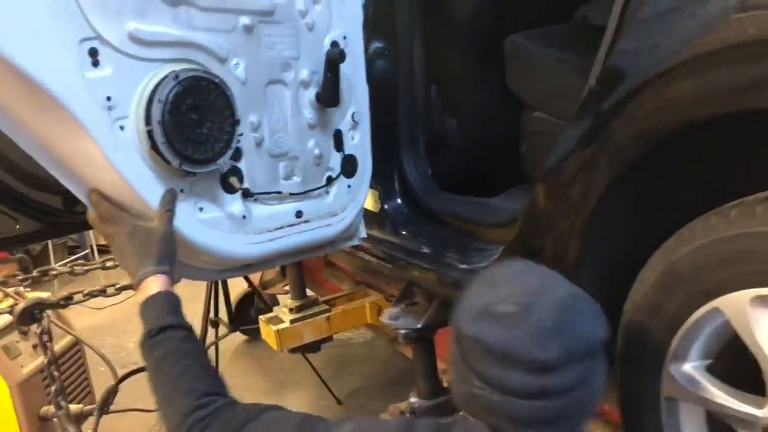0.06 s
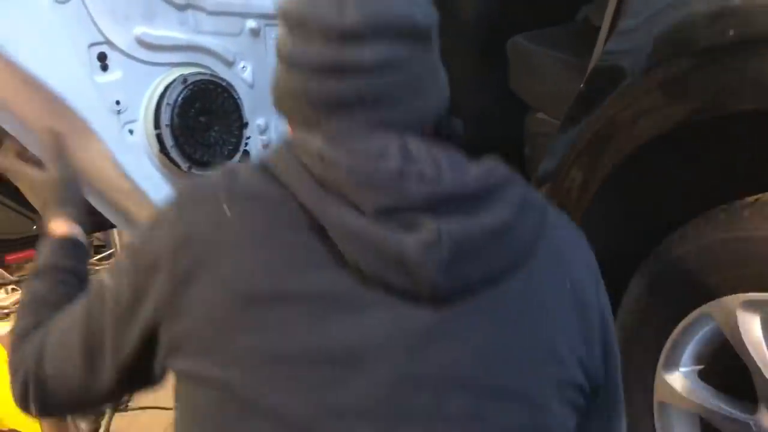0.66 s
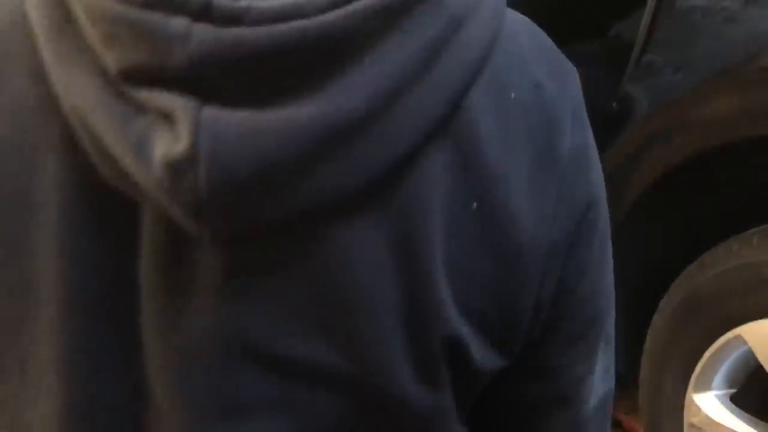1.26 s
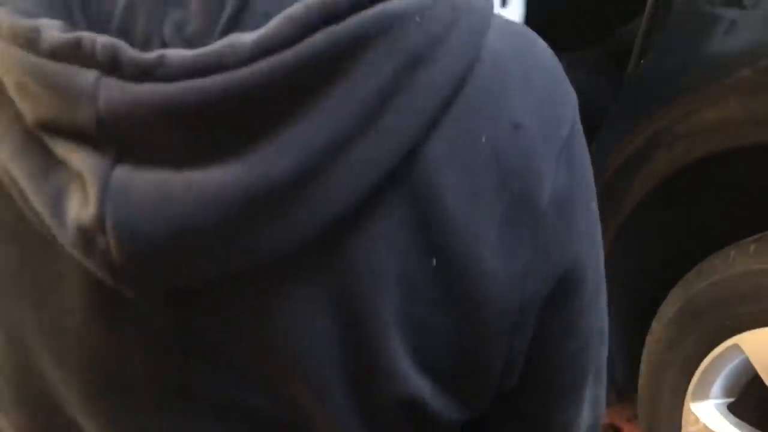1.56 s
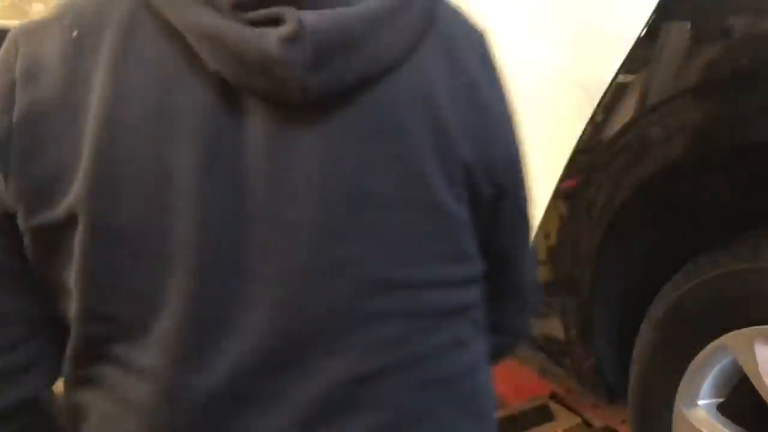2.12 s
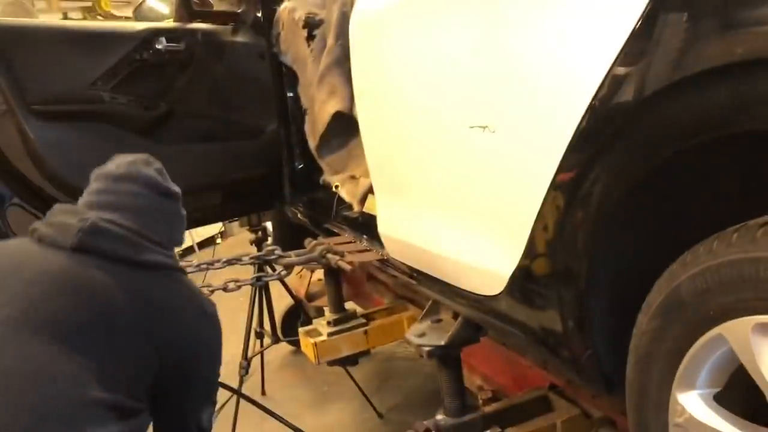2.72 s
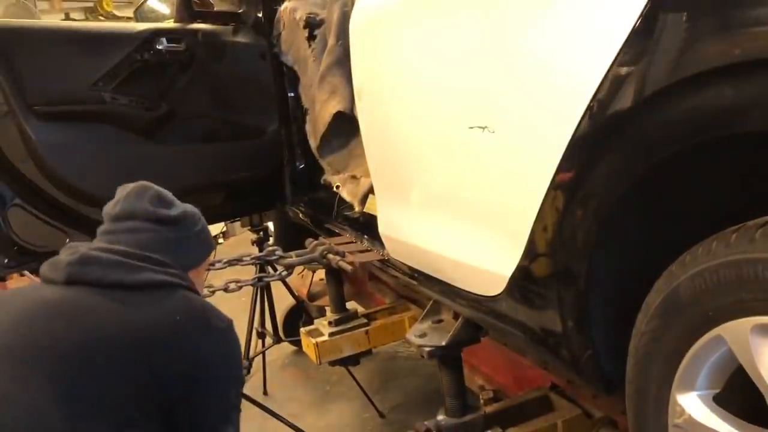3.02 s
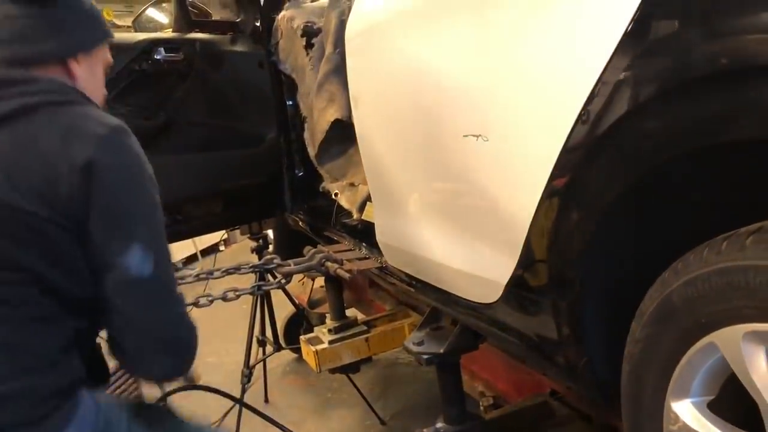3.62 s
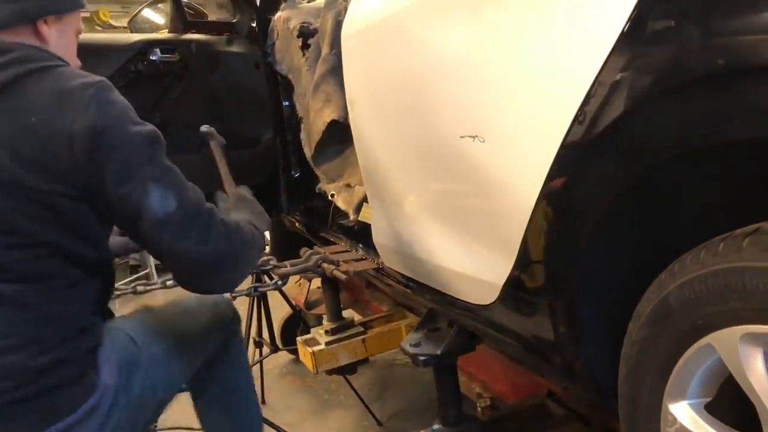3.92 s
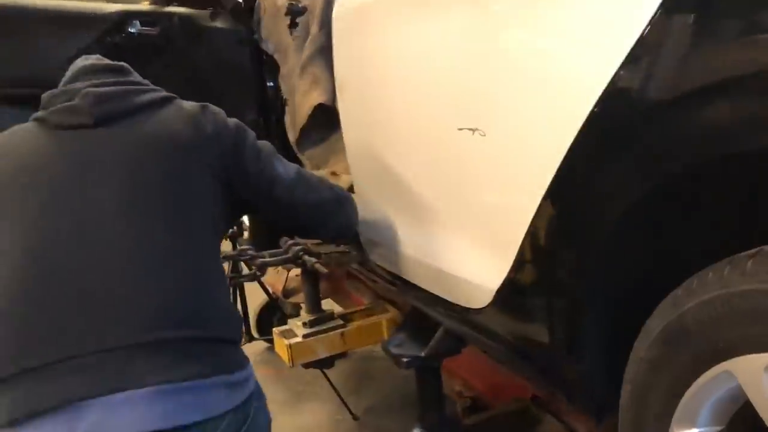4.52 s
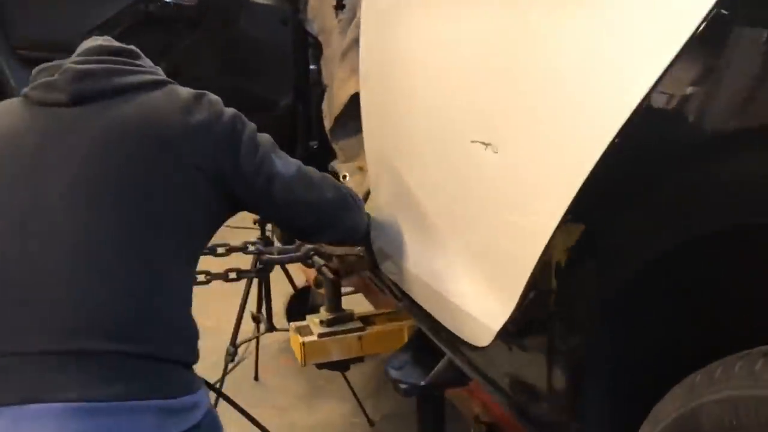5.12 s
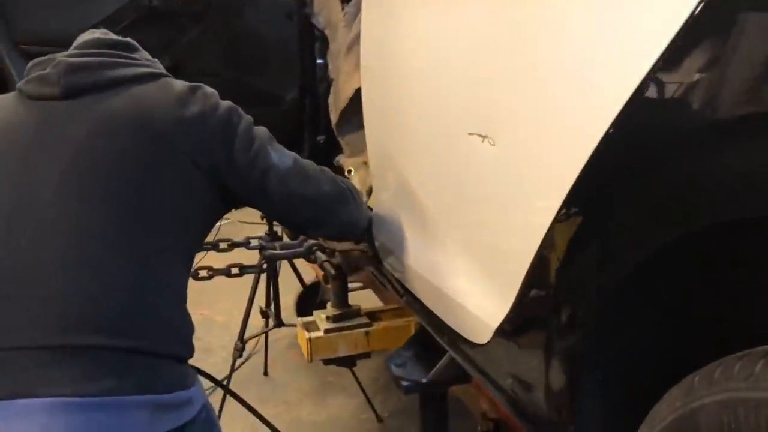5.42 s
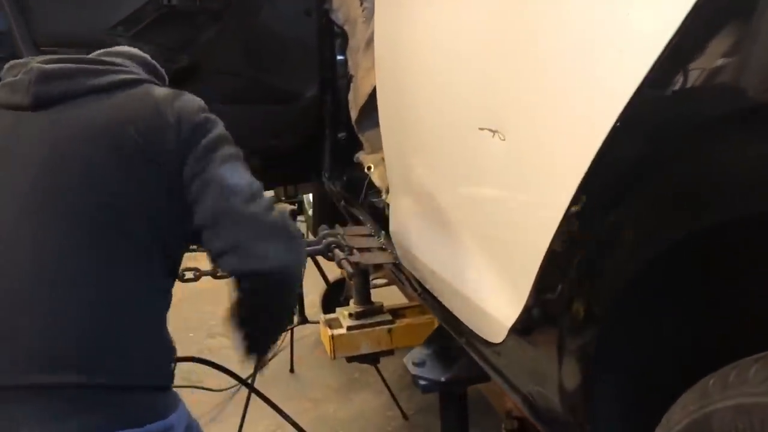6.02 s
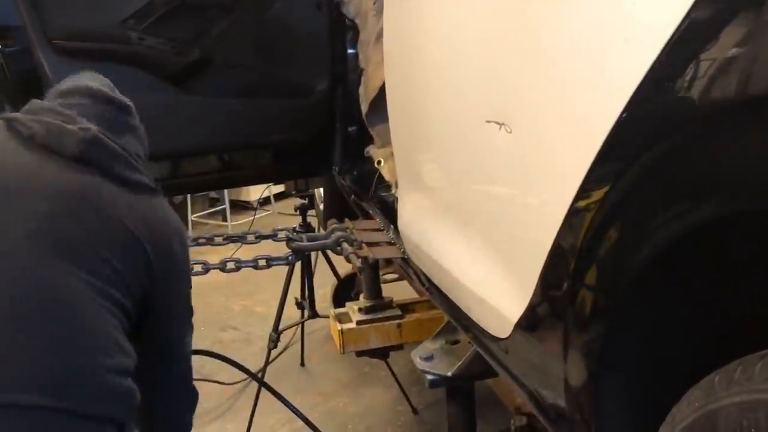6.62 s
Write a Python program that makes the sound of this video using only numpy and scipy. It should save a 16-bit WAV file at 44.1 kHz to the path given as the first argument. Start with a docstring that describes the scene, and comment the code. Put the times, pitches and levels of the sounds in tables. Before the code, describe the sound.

A faint machine rumble, hum and moving air fill a hard-walled workshop throughout. Clothes rustle very softly, with a dull footstep at 0.8 seconds and a shoe scuff at 1.5. At about 1.85 seconds a car door shuts with a quick latch rattle and a low thud. A steel bar clanks onto concrete at 2.8 seconds and another small tool clinks at 3.0. Faint ticks of tool and chain follow, with a footstep at 4.2. Then come the loudest sounds: four nearby hammer blows on a car's sheet steel panel, at 4.6, 4.95, 5.3 and 5.65 seconds, each a sharp crack with a hollow boom and a short metallic ring echoing in the room. At about 6.5 seconds the hammer drops on the floor, one end and then the other, with a bright, briefly ringing clatter.

```python
"""Soft shuffling and rustling clothes come first, over the low machine hum of a body shop. A man shuts a
car door, shifts steel tools on the concrete and hammers a chained, tensioned side panel four times, then
drops the hammer, which lands on one end and then the other. Each impact is a brief broadband burst; door,
tools and panel go on vibrating in their damped normal modes, and the hard room reverberates."""
import sys
import numpy as np
from scipy import signal
from scipy.fft import rfft, irfft, next_fast_len
from scipy.io import wavfile
from scipy.ndimage import uniform_filter1d

SR = 44100
rng = np.random.default_rng(int(sys.argv[2]) if len(sys.argv) > 2 else 0)


def bounce(signal):
    """Save signal as a 16-bit WAV file at the path given by the first command-line argument."""
    frames = np.transpose(np.atleast_2d(signal))
    limited = np.clip(frames, -1, 1)
    pcm = np.round(limited * 32767).astype(np.int16)
    wavfile.write(sys.argv[1], SR, pcm)


N = 298557
T = np.arange(SR) / SR  # seconds since a contact
SCENE_T = np.arange(N) / SR

# hammer blows on the panel: start_s, level_db, hollowness_db, swell_db
BLOWS = [(4.6042, -2, 1, -15.5), (4.959, -0.5, -3.5, -8), (5.3054, -1, -2, -7), (5.637, -1, 5, -8.5)]
# the boom swells again after each blow: delay_s, pitch_hz, level_db
SWELLS = [(.07, 340, 0), (.135, 305, -3)]
# spectra of the contact, the sheet giving way and its dense ringing: frequency_hz, level_db
CRACK_SPECTRUM = [(120, -42), (200, 3.5), (473, -6), (709, -0.5), (1350, -1), (1940, -1.5), (2560, -12.5),
                  (3560, -2), (4520, -14), (5040, -12.5), (8580, -15), (13100, -28.5), (16000, -39.5)]
THUMP_SPECTRUM = [(41, -40), (70, -32), (100, -19), (130, -11.5), (206, 3.5), (262, -6), (385, -1),
                  (432, 2.5), (517, 1.5), (643, 6), (1020, -3), (1300, -13.5), (1500, -49), (1950, -48.5),
                  (3300, -120)]
SHEET_SPECTRUM = [(24, -60.5), (40, -35.5), (127, -4), (189, -4), (215, -1), (256, -2), (305, -2.5),
                  (503, -14.5), (630, -13), (810, -22), (1020, -21), (2500, -28.5), (6170, -33),
                  (9690, -38), (16000, -53.5)]
# strongest modes of the panel: pitch_hz, level_db, t60_s
PANEL_MODES = [(137.4, -9, 0.74), (161.7, -7.5, 0.87), (182.2, -5, 0.82), (223.4, -1.5, 0.74),
               (243.4, 5, 0.32), (298, 0, 0.71), (308.5, -10.5, 0.94), (392.5, -3.5, 0.75),
               (404.5, -4.5, 0.65), (472, -8.5, 0.78), (547, -12, 0.76), (612, -3.5, 0.46),
               (690, 0.5, 0.21), (748, -13, 0.81), (930, -10.5, 0.64), (1020, -10.5, 0.75),
               (1477, -10.5, 0.42), (1860, -24.5, 0.64)]

# floor contacts of a bar laid down, a clamp tipping over and the hammer dropped handle first:
# start_s, level_db, bass_db, middle_db, treble_db, snap_db
BAR_HITS = [(2.793, -25.5, -9, 2.5, -4.5, 3.5), (2.805, -26, -2.5, 0.5, -2.5, -15),
            (2.869, -42.5, 14.5, -12, 1, 11)]
CLAMP_HITS = [(3.0205, -24, 0, -0.5, -12.5, 2.5), (3.089, -30.5, 1, 2, 5, 4.5)]
HAMMER_HITS = [(6.4825, -20, 1, 10, 8, -15.5), (6.486, -16.5, 4, 5, 0, 2),
               (6.5575, -9.5, -12.5, -12.5, -6, 5.5), (6.574, -18, 0.5, 10, 1, -2.5)]
# spectrum of each tool's knock: frequency_hz, level_db
BAR_SPECTRUM = [(59, -39), (100, -28), (229, -7.5), (308, -6), (381, 2), (662, -17), (801, -9.5),
                (1080, -11), (2080, -9), (3400, -16), (3780, -15), (6150, -22.5), (16000, -52)]
CLAMP_SPECTRUM = [(59, -45), (100, -13), (160, -23), (197, -8), (229, -7.5), (481, -7), (535, -9),
                  (736, -6.5), (1010, -9.5), (1450, -2), (2170, -9.5), (2800, -3.5), (3120, -18),
                  (4770, -22.5), (16000, -59)]
HAMMER_SPECTRUM = [(59, -55), (100, -27), (166, -22), (283, 4.5), (433, -14.5), (481, -12), (634, -10),
                   (854, -9), (1520, -4), (1610, -1.5), (1950, -10.5), (2520, -7), (2930, -13), (7940, -20),
                   (16000, -45.5)]
# modes of each tool: pitch_hz, level_db, t60_s
BAR_MODES = [(397, 5, 0.24), (925, 0, 0.16), (1720, -7, 0.75), (2100, -8, 0.42), (2870, -10, 0.31),
             (3030, 3, 0.21), (3200, -9, 0.33), (3740, -15, .5), (4185, -18, .7)]
CLAMP_MODES = [(199, 2, 0.49), (742, -10, 1), (1165, -8, 0.89), (1400, -1, 0.82), (1490, -0.5, 0.76),
               (2330, -7, 0.77), (2567, -13, .7), (2710, 0, 0.4), (2790, -4, 0.83), (2570, 4.5, 0.22)]
HAMMER_MODES = [(318, -11, 0.32), (489, -2, 1), (842, -6, 0.7), (1170, -7, 0.64), (1340, -4, 0.37),
                (1590, 4.5, 0.33), (1580, 0, 0.41), (1730, -8.5, 0.3), (1780, -12, 0.74), (2010, -4, 0.52),
                (2470, -1, 0.78), (2550, 1.5, .8), (2450, -11, 0.56), (3130, 0.5, 0.38), (4670, 0, 0.29)]

# latch, catch and slam of the door: start_s, level_db, bass_db, middle_db, treble_db
DOOR_HITS = [(1.831, -23.5, -14, -13, -9.5), (1.846, -21.5, -5.5, -2, 4), (1.859, -24, 1.5, 1, -11),
             (1.875, -22, 4.5, 0.5, 3.5)]
# spectra of the door's impact and the cabin's boom: frequency_hz, level_db
SLAM_SPECTRUM = [(18, -43), (30, -17), (109, -2.5), (204, -14), (328, -8), (437, -14), (584, -5),
                 (866, -8.5), (1040, -4.5), (1320, -14.5), (3060, -23.5), (6550, -31), (10500, -39),
                 (16000, -57)]
CABIN_SPECTRUM = [(18, -42), (30, -11), (145, 0), (194, -12), (233, -10.5), (345, -12), (702, -14.5),
                  (801, -23), (962, -14.5), (1070, -20.5), (1540, -19.5), (6050, -37), (10500, -45),
                  (16000, -73)]
# modes of the door skin: pitch_hz, level_db, t60_s
SKIN_MODES = [(48, -14, 1), (94.7, -9, 0.57), (122, 7, 0.28), (151.3, -1, 0.54), (174.8, -9, 0.49)]

# footfalls: start_s, level_db, hardness_db, settle_s
STEPS = [(0.798, -33, -23, 0.2), (0.858, -37.5, -10, 0.053), (4.187, -28.5, 2.5, 0.067)]
# light ticks of tool and chain: start_s, level_db, dullness_db
TICKS = [(2.189, -44.5, 13.5), (2.518, -44, 3), (2.993, -44.5, 4), (3.867, -53, -6), (3.973, -50.5, 9),
         (4.057, -43, -5.5), (4.307, -48.5, 2.5), (4.488, -52.5, -6.5), (4.513, -41, 5.5)]
# shoes sliding: peak_s, level_db, half_length_s
SCUFFS = [(1.402, -54.5, 0.026), (1.514, -41, 0.028), (4.561, -49.5, 0.036)]
# movements that rustle the clothes: start_s, length_s, level_db
MOVES = [(0.147, 0.21, -70), (0.62, 0.17, -70.5), (2.196, .35, -65.5), (2.891, 1.7, -65.5),
         (6.049, 0.18, -65)]
# spectra of a footfall, a tick, a sliding shoe and rubbing cloth: frequency_hz, level_db
SOLE_SPECTRUM = [(47, -45.5), (80, -27), (198, -2), (405, -23), (491, -16), (1020, -38.5), (1720, -41.5),
                 (2770, -47), (4170, -40.5), (6030, -41.5), (14000, -58)]
TICK_SPECTRUM = [(240, -33), (400, 1.5), (1790, -1), (3020, -7.5), (4510, -4), (7280, -8.5), (7990, -8.5),
                 (13500, -21.5), (16000, -34)]
SCUFF_SPECTRUM = [(180, -44), (300, -17), (364, -6), (1070, -12.5), (1700, 0.5), (2240, -8), (2670, -4.5),
                  (2940, -12), (5080, -16), (14000, -47)]
CLOTH_SPECTRUM = [(880, -32), (1500, 8.5), (1710, -8), (2910, -1), (4550, -1.5), (5380, -3), (12000, -16),
                  (16000, -36.5)]

# spectra of the shop's rumble and moving air: frequency_hz, level_db
RUMBLE_SPECTRUM = [(12, -41), (20, -15.5), (33, -1.5), (97, -5), (111, -4.5), (124, -8.5), (166, -6),
                   (216, -19), (300, -16), (390, -44.5), (660, -120)]
VENT_SPECTRUM = [(120, -38), (200, -3), (334, -6), (500, -8), (612, -8), (671, -8), (821, -9), (899, -5),
                 (1300, -15.5), (1560, -15.5), (2170, -22), (9060, -30), (16000, -46.5)]
# course of the motor's hum: time_s, level_db
HUM_LEVELS = [(0.65, -54), (1.3, -66), (6.1, -51.5), (6.77, -51.5)]
# reverberation time of the room: frequency_hz, t60_s
ROOM_DECAY = [(100, 0.68), (300, 0.69), (700, 0.89), (1800, 0.84), (4800, 0.75), (8000, 0.52),
              (13000, 0.33)]


def panel_blows():
    """Impulse excitation: the contact cracks, the sheet gives way, then panel and room ring."""
    out = np.zeros(N)
    edge_loss, face_db = 0.55, 4.5  # upper middle lost per dB of hollowness; treble of the hard face
    steel = rippled(SHEET_SPECTRUM)
    crack, thump, sheet = noise(CRACK_SPECTRUM), noise(THUMP_SPECTRUM), noise(steel)
    bend = bending_wave(start_hz=257.8, end_hz=128, glide_s=0.0243, t60=0.12)
    for start, db, hollow_db, swell_db in BLOWS:
        blow = amp(-6.5) * varied(crack, CRACK_SPECTRUM) * fade(t60=0.043, rise_s=0.001)
        blow += amp(-5.5) * varied(thump, THUMP_SPECTRUM) * fade(t60=0.094, rise_s=0.0045)
        blow += amp(-2.5) * bend
        blow += amp(-13) * reverberant(varied(sheet, steel), rise_s=0.0019)
        blow += amp(-15) * ring(PANEL_MODES, scatter_db=1.5, blur=0.0011) * onset(0.018)
        spot_eq = [(280, 0), (700, hollow_db - 0.5), (1900, -edge_loss * hollow_db), (5500, face_db)]
        add(out, start, amp(db) * shaped(blow, spot_eq))
        for delay, hz, late_db in SWELLS:
            swell = damped_sine(hz, t60=0.14, rise_s=0.0096)
            add(out, start + delay, amp(db + swell_db + late_db) * swell)
    return out


def bending_wave(start_hz, end_hz, glide_s, t60):
    """Dispersion: short waves cross a sheet faster than long ones, so the thump falls in pitch."""
    hz = end_hz + (start_hz - end_hz) * np.exp(-T / glide_s)
    return np.sin(2 * np.pi * np.cumsum(hz) / SR) * fade(t60, rise_s=0.0089)


def tools():
    """Radiation from small bodies: three tools strike the floor and give off little deep bass."""
    bar = floor_impacts(BAR_HITS, BAR_SPECTRUM, BAR_MODES, t60=0.14, room_db=-6.5, ring_db=-3)
    clamp = floor_impacts(CLAMP_HITS, CLAMP_SPECTRUM, CLAMP_MODES, t60=0.042, room_db=-9.5, ring_db=-8.5)
    hammer = floor_impacts(HAMMER_HITS, HAMMER_SPECTRUM, HAMMER_MODES,
                           t60=0.14, room_db=-7.5, ring_db=-10.5)
    handle_clunk = amp(-14) * damped_sine(hz=282.5, t60=0.21, rise_s=0.0066)
    add(hammer, HAMMER_HITS[1][0], handle_clunk)
    low_cut = signal.butter(2, 110, "highpass", fs=SR, output="sos")
    return signal.sosfilt(low_cut, bar + clamp + hammer)


def floor_impacts(hits, spectrum, modes, t60, room_db, ring_db):
    """Free vibration: steel meets concrete with a snap and a knock, then rings in its own modes."""
    out = np.zeros(N)
    steel = rippled(spectrum)
    for start, db, *tone, snap_db in hits:
        snap = amp(snap_db) * toned(noise(steel), tone) * fade(t60=0.036, rise_s=0.00049)
        ringing = amp(ring_db) * toned(ring(modes, scatter_db=2.5, blur=0.0055), tone) * onset(0.002)
        body = knock(steel, tone, t60, rise_s=0.001, room_db=room_db, stretch=1.045)
        add(out, start, amp(db) * (snap + ringing + body))
    return out


def car_door():
    """Cavity and plate resonance: the latch clicks, then the door pushes air in and its skin rings."""
    out = np.zeros(N)
    for start, db, *tone in DOOR_HITS:
        impact = toned(noise(SLAM_SPECTRUM), tone) * fade(t60=0.12, rise_s=0.00078)
        boom = reverberant(toned(noise(CABIN_SPECTRUM), tone), rise_s=0.0078)
        add(out, start, amp(db + 6.5) * impact + amp(db - 3) * boom)
    air_push = amp(-14) * damped_sine(hz=97.3, t60=0.15, rise_s=0.0037)
    skin = amp(-15.5) * ring(SKIN_MODES, scatter_db=1, blur=0.0048) * onset(0.0098)
    add(out, DOOR_HITS[-1][0], air_push + skin)
    return out


def footfalls():
    """Soft impact: a sole takes the weight gradually, so its sound lies mostly in the bass."""
    out = np.zeros(N)
    for start, db, hard_db, settle_s in STEPS:
        tone = (0, hard_db, hard_db)
        step = knock(SOLE_SPECTRUM, tone, settle_s, rise_s=0.023 * settle_s, room_db=-11.5, stretch=0.86)
        add(out, start, amp(db + 3) * step)
    return out


def metal_ticks():
    """Hard impact: the brief contacts of tool and chain spread their energy over a wide band."""
    out = np.zeros(N)
    for start, db, dull_db in TICKS:
        tone = (dull_db, 0.4 * dull_db, -0.6 * dull_db)
        add(out, start, amp(db) * knock(TICK_SPECTRUM, tone, t60=0.075, rise_s=0.00075, room_db=-8.5))
    return out


def shoe_scuffs():
    """Sliding friction: noise follows the shoe's pressure, roughened by grit and echoed by the walls."""
    pressure = sum(amp(db) * np.exp(-np.abs(SCENE_T - peak) / width) for peak, db, width in SCUFFS)
    grit_db = 1.3 * unit(uniform_filter1d(rng.standard_normal(N), size=90))
    slide = pressure * unit(amp(grit_db) * noise(SCUFF_SPECTRUM, size=N))
    walls = reverberant(rng.standard_normal(SR), rise_s=0.005)
    return slide + amp(-7) * signal.fftconvolve(slide, walls / np.linalg.norm(walls))[:N]


def clothes():
    """Friction of cloth: each move starts a rustle that holds and dies away, made uneven by folds."""
    attack_s, release_s = 0.022, 0.065
    motion = np.zeros(N)
    for start, length, db in MOVES:
        attack = np.clip((SCENE_T - start) / attack_s, 0, 1)
        release = np.exp(-np.maximum(SCENE_T - start - length, 0) / release_s)
        motion += amp(db) * attack * release
    folds = uniform_filter1d(rng.standard_normal(N), size=1500)
    folds_db = 3.3 * unit(uniform_filter1d(folds, size=700))
    return motion * amp(folds_db) * noise(CLOTH_SPECTRUM, size=N)


def workshop():
    """Continuous noise and a pure tone: a rumble that swells once, moving air and a motor's hum."""
    peak_s, rise_s, fall_s, hum_hz = 2.85, 0.27, 1.56, 94.4
    width_s = np.where(SCENE_T < peak_s, rise_s, fall_s)
    surge_db = 6 * np.exp(-((SCENE_T - peak_s) / width_s) ** 2)
    rumble = amp(-54.5 + surge_db) * noise(RUMBLE_SPECTRUM, size=N)
    hum_db = np.interp(SCENE_T, *np.transpose(HUM_LEVELS))
    hum = amp(hum_db) * np.sqrt(2) * np.sin(2 * np.pi * hum_hz * SCENE_T)
    return rumble + hum + amp(-57.5) * noise(VENT_SPECTRUM, size=N)


def knock(spectrum, tone, t60, rise_s, room_db, stretch=1.0):
    """Direct and diffuse fields: a short burst and the room's answer to it."""
    direct = toned(noise(spectrum), tone) * fade(t60, rise_s)
    diffuse = reverberant(toned(noise(spectrum), tone), rise_s=0.0016, stretch=stretch)
    return direct + amp(room_db) * diffuse


def reverberant(x, rise_s, stretch=1.0):
    """Reverberation: sound builds up, then each frequency decays in the room's t60 times stretch."""
    hz, t, bands = signal.stft(x, SR, nperseg=256)
    t60 = stretch * along(ROOM_DECAY, hz)[:, None]
    tail = signal.istft(bands * amp(-60 * t / t60), SR, nperseg=256)[1]
    return tail[:SR] * onset(rise_s)


def ring(modes, scatter_db, blur):
    """Modal superposition: decaying sines, each line blurred by echoes over a small share of its pitch."""
    hz, db, t60 = np.transpose(modes)[:, :, None]
    gain = amp(db + scatter_db * rng.standard_normal(db.shape)) / np.linalg.norm(amp(db))
    drift = np.cumsum(rng.standard_normal((len(hz), SR)), axis=1) * np.sqrt(2 * np.pi * blur * hz / SR)
    phase = 2 * np.pi * hz * T + uniform_filter1d(drift, size=200, axis=1)
    return np.sqrt(2) * np.sum(gain * amp(-60 * T / t60) * np.sin(phase), axis=0)


def rippled(spectrum, depth_db=3):
    """Modal overlap: countless small resonances of steel ripple its spectrum above the bass."""
    hz = np.linspace(20, SR / 2, 900)
    ripple_db = depth_db * rng.standard_normal(len(hz)) * np.minimum(hz / 1200, 1)
    return np.transpose([hz, along(spectrum, hz) + ripple_db])


def varied(x, spectrum, likeness=0.7):
    """Partial correlation: one spot sounds much alike, but not the same, at each blow."""
    return likeness * x + np.sqrt(1 - likeness ** 2) * noise(spectrum)


def noise(spectrum, size=SR):
    """Coloured noise of rms 1: components too dense to tell apart."""
    return unit(shaped(rng.standard_normal(size), spectrum))


def toned(x, tone):
    """Spectral balance: the place and hardness of a contact shift its bass, middle and treble."""
    bass, middle, treble = tone
    return shaped(x, [(280, bass), (700, middle), (1900, 0), (5500, treble)])


def shaped(x, spectrum):
    """Spectral weighting by points of frequency_hz, level_db."""
    return filtered(x, lambda hz: amp(along(spectrum, hz)))


def filtered(x, response):
    """Linear filtering: the spectrum of x times a frequency response."""
    size = next_fast_len(len(x) + 8192)
    return irfft(rfft(x, size) * response(np.fft.rfftfreq(size, 1 / SR)), size)[:len(x)]


def damped_sine(hz, t60, rise_s):
    """Damped oscillation at one frequency."""
    return np.sin(2 * np.pi * hz * T) * fade(t60, rise_s)


def fade(t60, rise_s):
    """Exponential decay, 60 dB in t60 seconds, with a smooth onset."""
    return amp(-60 * T / t60) * onset(rise_s)


def onset(rise_s):
    """Smooth build-up from 0 to 1."""
    return 1 - np.exp(-(T / rise_s) ** 2)


def along(points, hz):
    """Interpolation on a logarithmic frequency axis."""
    point_hz, values = np.transpose(points)
    return np.interp(np.log(hz + 1), np.log(point_hz + 1), values)


def amp(db):
    """Decibels to amplitude ratio."""
    return 10 ** (np.asarray(db) / 20)


def unit(x):
    """Normalisation to rms 1."""
    return x / np.sqrt(np.mean(x ** 2) + 1e-20)


def add(track, start_s, sound):
    """Superpose a sound on a track."""
    part = track[round(start_s * SR):][:len(sound)]
    part += sound[:len(part)]


def scene():
    """Superposition: the pressures of all sources add at one microphone."""
    impacts = panel_blows() + car_door() + tools() + footfalls() + metal_ticks()
    return (impacts + shoe_scuffs() + clothes() + workshop())[None]


def record(dry):
    """Soft limiting and band limiting: the loudest peaks are rounded off, and deep bass and top treble fall
    away."""
    ceiling, low_hz, top_hz = 0.92, 42.0, 16200
    rounded = dry[0] / (1 + np.abs(dry[0] / ceiling) ** 6) ** (1 / 6)
    passband = lambda hz: hz ** 3 / np.sqrt(hz ** 6 + low_hz ** 6) * (hz < top_hz)
    return filtered(rounded, passband)[None]


dry = scene()
out = record(dry)
bounce(out)
```